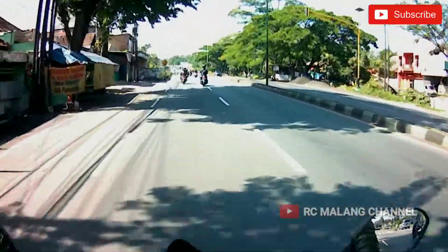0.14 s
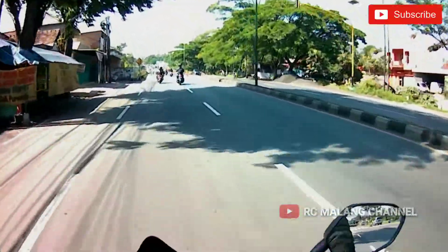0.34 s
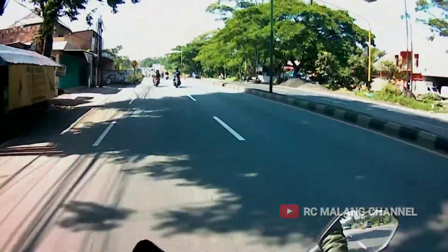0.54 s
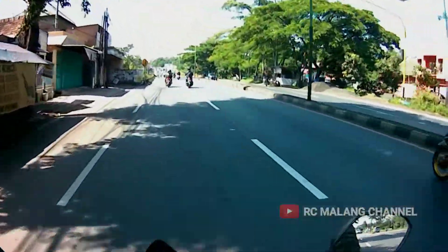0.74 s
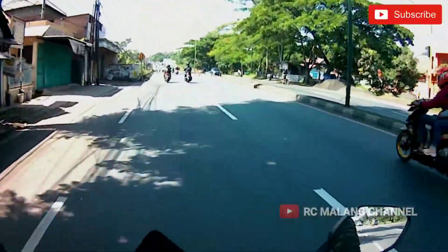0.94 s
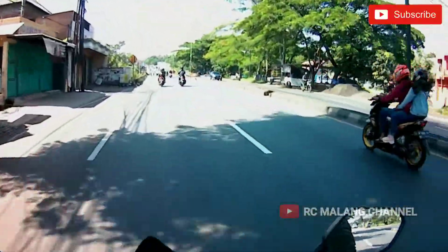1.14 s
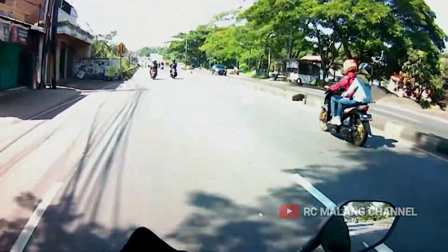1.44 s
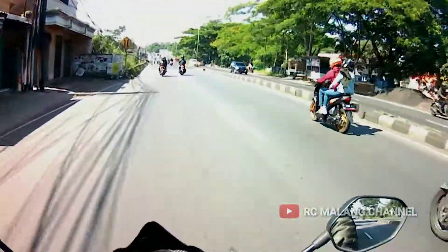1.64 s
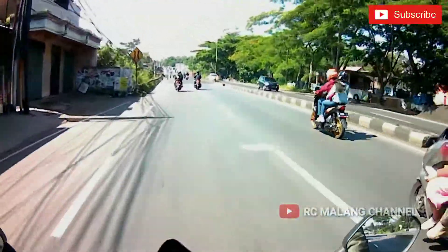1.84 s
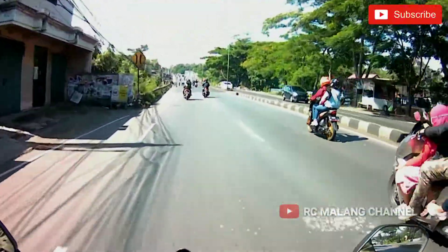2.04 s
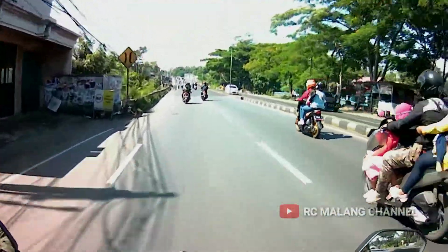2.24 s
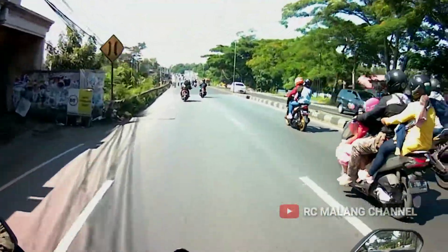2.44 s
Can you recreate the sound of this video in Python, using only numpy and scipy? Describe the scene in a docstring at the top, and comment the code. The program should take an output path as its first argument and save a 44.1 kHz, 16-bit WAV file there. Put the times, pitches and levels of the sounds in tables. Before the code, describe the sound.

Small motorcycle engine hums low and unsteady under booming wind, heard from the rider's seat

```python
"""A small single-cylinder motorcycle on a town road, heard from the rider's seat, 2.6 s.
From the start its exhaust, sine lines locked to the firings, hums at 183 Hz under noise-band wind and gusts.
The hum dips to 171 Hz, jumps to 196 Hz near 0.9 s, then sinks to 181 Hz; crank drone surges from 1.15 s.
Two thin high hisses of overtaking bikes come at 0.5 and 0.7 s, two lower ones at 1.45 and 2.0 s.
Throughout, noise bursts make the wind boom, roar and hiss, and a fast limiter ducks the peaks."""
import sys
import numpy as np
from scipy import signal
from scipy.io import wavfile
from scipy.ndimage import uniform_filter1d, minimum_filter1d

SR = 44100
rng = np.random.default_rng(int(sys.argv[2]) if len(sys.argv) > 2 else 0)


def inscribe(sig):
    """Save sig as 16-bit PCM at rate SR to the path in sys.argv[1].

    A 1-D sig is mono; a 2-D sig holds one channel per row.
    Samples are clipped to [-1, 1] before scaling.
    """
    pcm = np.round(np.clip(np.atleast_2d(sig).T, -1, 1) * 32767)
    wavfile.write(sys.argv[1], SR, pcm.astype(np.int16))


N = 114660
TIME_S = np.arange(N) / SR


def from_db(db):
    """Decibels to amplitude gain."""
    return 10 ** (np.asarray(db) / 20)


def rms_one(x):
    """Scale to rms 1."""
    return x / np.sqrt(np.mean(x ** 2) + 1e-20)


def in_time(rows):
    """Straight-line curve through (time, value) rows, at every sample."""
    return np.interp(TIME_S, *np.transpose(rows))


def bump(centre_s, length_s):
    """Gaussian of peak 1; length_s is its full width at 1/e."""
    return np.exp(-(2 * (TIME_S - centre_s) / length_s) ** 2)


def drift(rate_hz):
    """Low-passed noise, rms 1, computed at SR / 20 and interpolated."""
    step = 20
    pole = np.exp(-2 * np.pi * rate_hz * step / SR)
    white = rng.standard_normal(N // step + 2002)
    slow = signal.lfilter([1], [1, -2 * pole, pole ** 2], white)[2000:]  # drop the filter's run-in
    return np.interp(np.arange(N) / step, np.arange(len(slow)), rms_one(slow))


def banded_noise(spectrum, patchy_db):
    """Quarter-octave noise bands shaped by a density spectrum, each flickering on its own; rms 1."""
    hz, db = np.transpose(spectrum)
    edges_hz = 22 * 2 ** (np.arange(39) / 4)
    white = rng.standard_normal((2, N + SR // 2))
    out = 0
    for k, (low_hz, high_hz) in enumerate(zip(edges_hz, edges_hz[1:])):
        bandpass = signal.butter(2, [low_hz, high_hz], "band", fs=SR, output="sos")
        band = signal.sosfilt(bandpass, white[k % 2])[-N:]  # neighbours use different noise
        log_centre = np.log(low_hz * high_hz) / 2
        level_db = np.interp(log_centre, np.log(hz), db, left=-90, right=-90)
        out = out + band * from_db(level_db + patchy_db * drift(17))
    return rms_one(out)


def evened(x, share):
    """Divide out a share of a noise's chance swells; rms 1."""
    power = uniform_filter1d(np.abs(signal.hilbert(x)) ** 2, size=1500)
    return rms_one(x / (power + 1e-6) ** (share / 2))


def swell(centre_s, length_s, centre_hz, width_hz, steady):
    """Low-passed noise pair shifted up to centre_hz under a bump; steady evens its chance beats."""
    lowpass = signal.butter(2, width_hz / 2, fs=SR, output="sos")
    slow = signal.sosfilt(lowpass, rng.standard_normal((2, N + SR // 2)))[:, -N:]
    phase = 2 * np.pi * np.cumsum(centre_hz * np.ones(N)) / SR
    power = rms_one(slow[0]) ** 2 + rms_one(slow[1]) ** 2
    band = slow[0] * np.cos(phase) + slow[1] * np.sin(phase)
    band = band / (power + 0.46) ** (steady / 2)
    return bump(centre_s, length_s) * rms_one(band)


# exhaust hum, four times the firing rate: [time_s, pitch_hz]
HUM_PITCH = [(0.0, 183), (0.24, 182.6), (0.35, 171), (0.47, 180), (0.7, 172.5), (0.93, 196), (1.25, 193),
             (1.55, 191), (1.95, 189.5), (2.19, 185), (2.45, 187), (2.6, 181)]
# hum level before flutter: [time_s, rms_db]
HUM_LEVEL = [(0, -27.5), (.1, -14), (.36, -12.5), (.46, -20.5), (.6, -12), (.85, -19.5), (1.0, -26),
             (1.23, -15), (1.42, -24), (1.56, -15.5), (1.8, -11.5), (1.95, -13), (2.05, -19), (2.2, -11.5),
             (2.45, -19), (2.6, -15.5)]
# crankshaft-speed drone, twice the firing rate, before flutter: [time_s, rms_db]
CRANK_LEVEL = [(0, -27), (.25, -29), (.46, -19), (.58, -24.5), (.98, -19.5), (1.15, -11), (1.3, -16),
               (1.44, -10.5), (1.62, -16), (1.75, -23), (1.96, -29), (2.1, -11.5), (2.2, -25), (2.33, -11),
               (2.6, -23)]
# weaker exhaust lines before flutter: [multiple_of_firing_rate, rms_db]
EXHAUST_LINES = [(1, -24.5), (3, -28.5), (5, -29), (6, -31), (7, -32), (10, -37.5), (15, -44)]
LINE_FLUTTER_DB, LINE_FLUTTER_HZ = 2, 2.1
FIRING_ROUGH_DB = 1.5   # spread of strength between firings
FIRING_JITTER_CYCLES, FIRING_JITTER_HZ = 0.0081, 8


def engine():
    """Sines on multiples of a jittered firing rate; each line's strength varies per firing."""
    firing_hz = in_time(HUM_PITCH) / 4
    firings = np.cumsum(firing_hz) / SR + FIRING_JITTER_CYCLES * drift(FIRING_JITTER_HZ)
    lines = [(4, in_time(HUM_LEVEL)), (2, in_time(CRANK_LEVEL))] + EXHAUST_LINES
    each_firing = np.arange(160)
    exhaust = 0
    for multiple, level_db in lines:
        strengths = rng.standard_normal(len(each_firing))
        rough_db = FIRING_ROUGH_DB * np.interp(firings, each_firing, strengths)
        flutter_db = LINE_FLUTTER_DB * drift(LINE_FLUTTER_HZ)
        gain = np.sqrt(2) * from_db(level_db + rough_db + flutter_db)
        exhaust = exhaust + gain * np.sin(2 * np.pi * (round(multiple) * firings + rng.random()))
    return exhaust + whirr(firings, firing_hz.mean())


# whirr lines before spread and flutter: [frequency_hz, peak_db_per_line]
WHIRR_SPECTRUM = [(400, -53.5), (700, -45.5), (1000, -48.5), (1400, -50.5), (2000, -60.5), (2800, -64),
                  (3500, -68.5)]
WHIRR_SPREAD_DB, WHIRR_FLUTTER_DB, WHIRR_FLUTTER_HZ = 3, 3, 5


def whirr(firings, mean_firing_hz):
    """Valve gear and chain repeat with each firing: a dense comb of uneven, fluttering lines."""
    multiples = np.arange(11, 76)
    hz, db = np.transpose(WHIRR_SPECTRUM)
    levels_db = np.interp(np.log(multiples * mean_firing_hz), np.log(hz), db)
    levels_db = levels_db + WHIRR_SPREAD_DB * rng.uniform(-1, 1, len(multiples))
    comb = 0
    for multiple, level_db in zip(multiples, levels_db):
        gain = from_db(level_db + WHIRR_FLUTTER_DB * drift(WHIRR_FLUTTER_HZ))
        comb = comb + gain * np.sin(2 * np.pi * (multiple * firings + rng.random()))
    return comb


# buffeting level before trim: [time_s, level_db]
BUFFET_LEVEL = [(0.0, -19), (0.42, -18.5), (0.66, -21), (0.85, -17.5), (1.3, -15.5), (1.56, -22),
                (1.87, -17.5), (2.2, -24), (2.6, -23.5)]
# buffeting colour, relative: [frequency_hz, density_db]
BUFFET_SPECTRUM = [(25, -30), (35, -22), (50, -1), (68, 0.5), (90, -2.5), (130, -22.5)]
BUFFET_TRIM_DB = 3.5


def wind_buffet():
    """Slow eddies thump on the microphone: partly evened bass noise under a level curve."""
    noise = evened(banded_noise(BUFFET_SPECTRUM, patchy_db=0.5), share=0.57)
    return from_db(BUFFET_TRIM_DB + in_time(BUFFET_LEVEL)) * noise


# rumble level: [time_s, rms_db]
RUMBLE_LEVEL = [(0, -13.5), (.22, -12), (.36, -17), (.48, -11.5), (.6, -15), (.78, -10.5), (.92, -13),
                (1.05, -15), (1.36, -10), (1.5, -12.5), (1.64, -14), (1.85, -11), (1.98, -11.5), (2.1, -13),
                (2.3, -10.5), (2.6, -12)]
# rumble colour, relative: [frequency_hz, density_db]
RUMBLE_SPECTRUM = [(50, -26.5), (80, -8), (115, 3), (160, -0.5), (220, -2), (300, -6), (400, -16.5),
                   (600, -26), (1000, -53.5)]


def wind_rumble():
    """Heaving wind rumble: partly evened low noise under a level curve."""
    noise = evened(banded_noise(RUMBLE_SPECTRUM, patchy_db=2.0), share=0.73)
    return from_db(in_time(RUMBLE_LEVEL)) * noise


# large eddies: [centre_s, length_s, pitch_hz, peak_rms_db]
BOOMS = [(0.207, 0.072, 230, -13), (0.285, 0.022, 560, -28), (0.546, 0.089, 52, -16.5),
         (0.744, 0.067, 470, -21.5), (0.95, 0.16, 67, -7), (1.024, 0.043, 305, -13.5),
         (1.22, 0.096, 600, -28.5), (1.352, 0.065, 71.8, -14), (1.479, 0.032, 520, -26),
         (1.977, 0.035, 540, -23), (1.997, 0.04, 70, -12.5), (2.188, 0.028, 500, -26.5),
         (2.405, 0.13, 53, -7.5), (2.447, .035, 270, -13.5)]
BOOM_WIDTH = 0.22   # bandwidth / pitch


def wind_booms():
    """Single large eddies boom on the microphone: short steadied noise bands, each with its own pitch."""
    booms = 0
    for centre_s, length_s, pitch_hz, level_db in BOOMS:
        band = swell(centre_s, length_s, pitch_hz, BOOM_WIDTH * pitch_hz, steady=1.0)
        booms = booms + from_db(level_db) * band
    return booms


# gusts, and one faint tick-like puff of hiss at 2.44 s, levels before trim: [centre_s, length_s, roar_db,
# hiss_db]
BURSTS = [(0.044, 0.026, -27, -51), (0.193, 0.073, -25, -46.5), (0.268, 0.036, -26, -49.5),
          (0.46, 0.063, -29.5, -49), (0.632, 0.02, -22.5, -41), (0.749, 0.087, -27.5, -49.5),
          (0.827, 0.056, -25, -44.5), (0.967, 0.032, -27.5, -49), (1.022, 0.026, -27, -46.5),
          (1.087, 0.022, -30.5, -45.5), (1.165, 0.063, -26, -46.5), (1.245, 0.059, -25, -44),
          (1.341, 0.15, -24, -46.5), (1.493, 0.034, -23.5, -45.5), (1.789, 0.075, -24, -47),
          (1.91, 0.077, -27, -53), (1.968, 0.074, -21, -44), (2.074, 0.058, -28, -46),
          (2.186, 0.033, -23, -44.5), (2.25, 0.066, -23, -44.5), (2.311, 0.035, -30.5, -45.5),
          (2.44, 0.077, -33, -47.5), (2.543, 0.15, -28.5, -47)]
# roar colour, relative: [frequency_hz, density_db]
ROAR_SPECTRUM = [(200, -2.5), (350, -3), (500, -2), (700, -1), (900, -8), (1400, -8), (1900, -21.5),
                 (2600, -20.5), (3000, -48), (5000, -50)]
# hiss colour, relative: [frequency_hz, density_db]
HISS_SPECTRUM = [(1500, -13.5), (2400, -1.5), (3000, -3), (3500, 1.5), (4500, -1.5), (5500, -11.5),
                 (7000, -21.5), (10000, -41.5), (12000, -60)]
BREEZE_ROAR_DB, BREEZE_HISS_DB = -30.5, -50   # steady airflow, before trim
ROAR_TRIM_DB, HISS_TRIM_DB = -1, -0.5
TEAR_HZ, ROAR_TEAR_DB, HISS_TEAR_DB = 49, 2.5, 1.0   # fast turbulence


def wind_rush():
    """Gusts and one faint tick add power to steady airflow; roar and hiss share one fast turbulence."""
    roar_power = from_db(BREEZE_ROAR_DB) ** 2
    hiss_power = from_db(BREEZE_HISS_DB) ** 2
    for centre_s, length_s, roar_db, hiss_db in BURSTS:
        shape = bump(centre_s, length_s)
        roar_power = roar_power + shape * from_db(roar_db) ** 2
        hiss_power = hiss_power + shape * from_db(hiss_db) ** 2
    tear = drift(TEAR_HZ)
    roar = rms_one(from_db(ROAR_TEAR_DB * tear) * banded_noise(ROAR_SPECTRUM, patchy_db=0.5))
    hiss = rms_one(from_db(HISS_TEAR_DB * tear) * banded_noise(HISS_SPECTRUM, patchy_db=0.8))
    roar = from_db(ROAR_TRIM_DB) * np.sqrt(roar_power) * roar
    hiss = from_db(HISS_TRIM_DB) * np.sqrt(hiss_power) * hiss
    return roar + hiss


# overtaking bikes: [centre_s, length_s, start_hz, end_hz, width_hz, peak_rms_db]
PASSES = [(0.482, 0.19, 4620, 4580, 650, -49.5), (0.71, 0.3, 4600, 4560, 600, -50),
          (1.45, 0.42, 1688, 1427, 416, -35), (2.012, 0.62, 1386, 1341, 319, -41)]


def passing_bikes():
    """Each pass is a noise band that swells, sinks in pitch and fades."""
    passes = 0
    for centre_s, length_s, start_hz, end_hz, width_hz, level_db in PASSES:
        pitch_hz = np.interp((TIME_S - centre_s) / length_s, [-.5, .5], [start_hz, end_hz])
        passes = passes + from_db(level_db) * swell(centre_s, length_s, pitch_hz, width_hz, steady=0)
    return passes


def scene():
    """Engine, wind and traffic at one microphone."""
    wind = wind_buffet() + wind_rumble() + wind_booms() + wind_rush()
    return (engine() + wind + passing_bikes())[None]


LIMIT_THRESHOLD_DB, LIMIT_WINDOW_S, LIMIT_RELEASE_DB_PER_S = -5.5, 0.0042, 356.5


def limiter(x):
    """Look-ahead limiter: smoothed gain dips around peaks, release linear in dB."""
    over_db = np.maximum(20 * np.log10(np.abs(x) + 1e-9) - LIMIT_THRESHOLD_DB, 0)
    fall_db = LIMIT_RELEASE_DB_PER_S * TIME_S
    duck_db = np.maximum.accumulate(over_db + fall_db) - fall_db
    span = max(int(LIMIT_WINDOW_S * SR), 2)
    gain_db = minimum_filter1d(-duck_db, span)  # centred windows, so it acts ahead of the peak
    gain_db = uniform_filter1d(uniform_filter1d(gain_db, span), span)
    return x * from_db(gain_db)


NOTCH_HZ, NOTCH_Q, NOTCH_DEPTH = 2927, 4.6, 0.62   # depth: share of the peak removed
INPUT_DB, OUTPUT_DB = -1.5, 1.5
LOW_CUT_HZ, HIGH_CUT_HZ = 38, 15500


def record(dry):
    """Microphone with a shallow notch, then limiter, deep-bass cut and steep treble cut."""
    peak = signal.lfilter(*signal.iirpeak(NOTCH_HZ, NOTCH_Q, fs=SR), dry[0])
    x = dry[0] - NOTCH_DEPTH * peak
    x = limiter(x * from_db(INPUT_DB))
    x = signal.sosfilt(signal.butter(2, LOW_CUT_HZ, "high", fs=SR, output="sos"), x)
    treble_cut = signal.ellip(8, .1, 70, HIGH_CUT_HZ, fs=SR, output="sos")
    return signal.sosfilt(treble_cut, x * from_db(OUTPUT_DB))[None]


dry = scene()
out = record(dry)
inscribe(out)
```